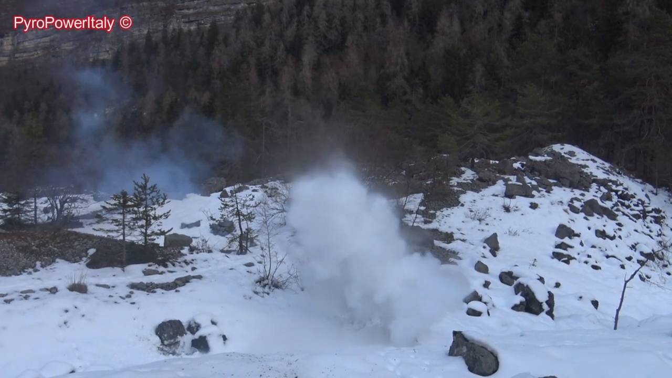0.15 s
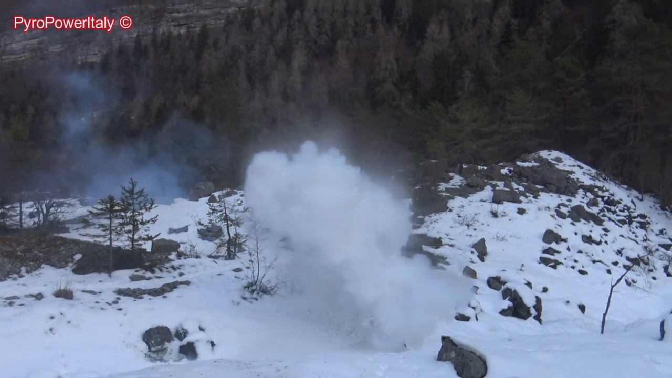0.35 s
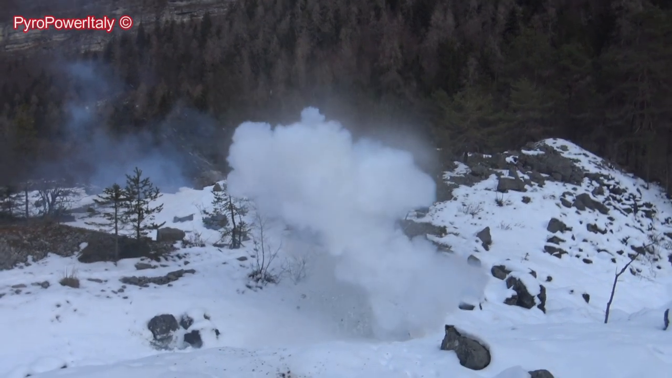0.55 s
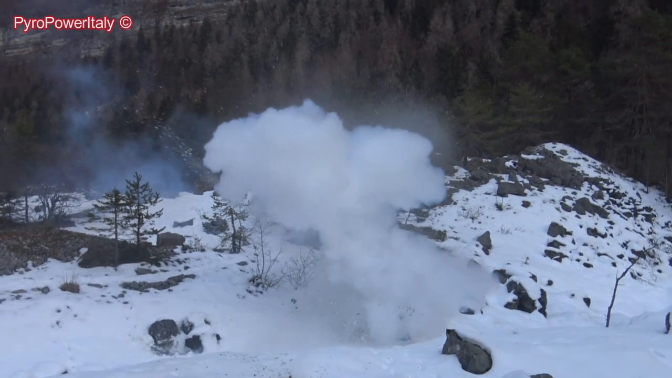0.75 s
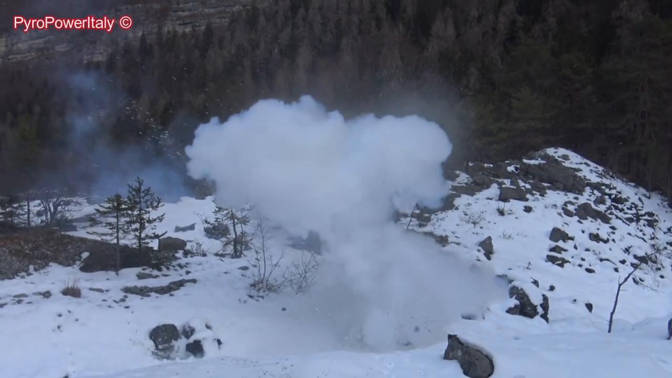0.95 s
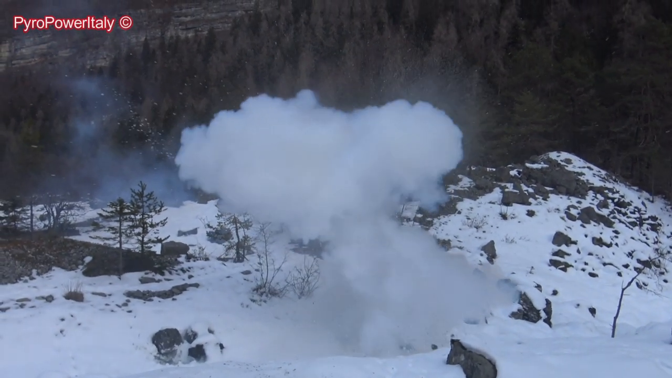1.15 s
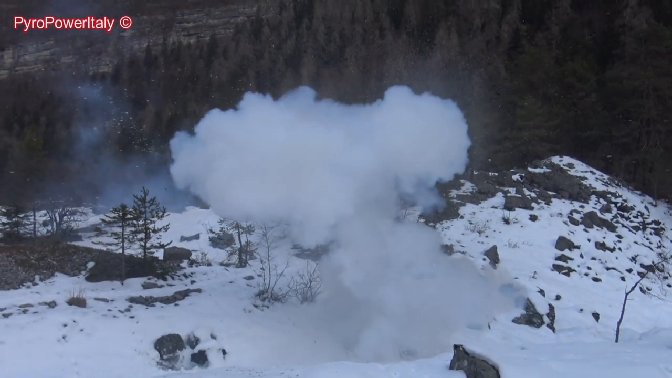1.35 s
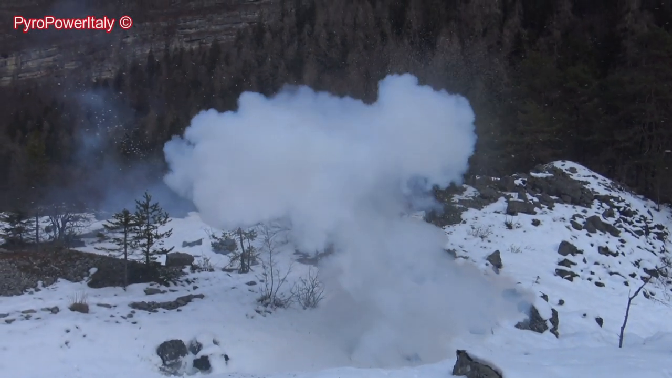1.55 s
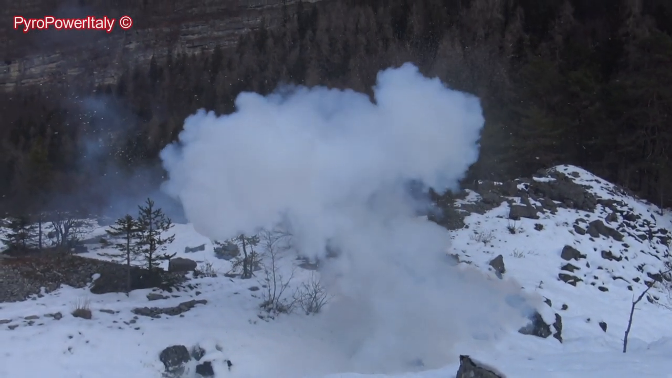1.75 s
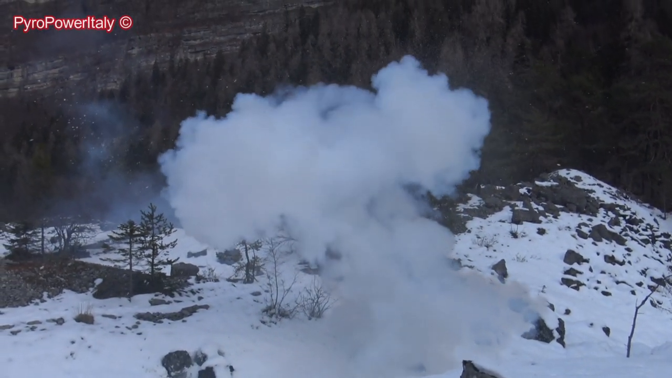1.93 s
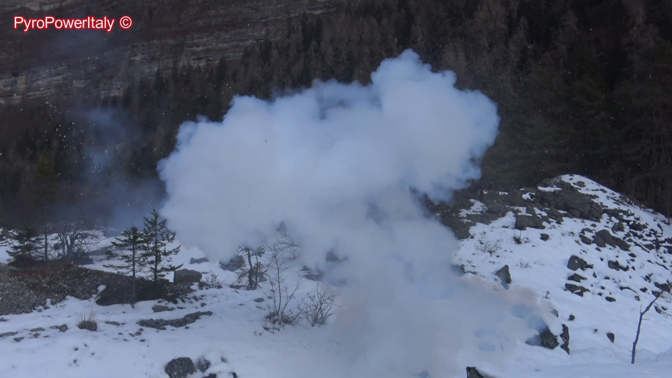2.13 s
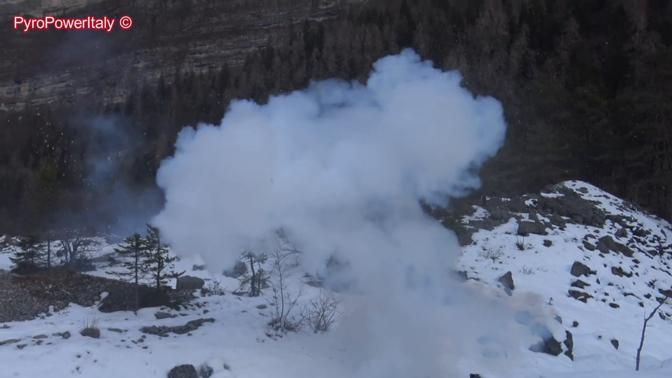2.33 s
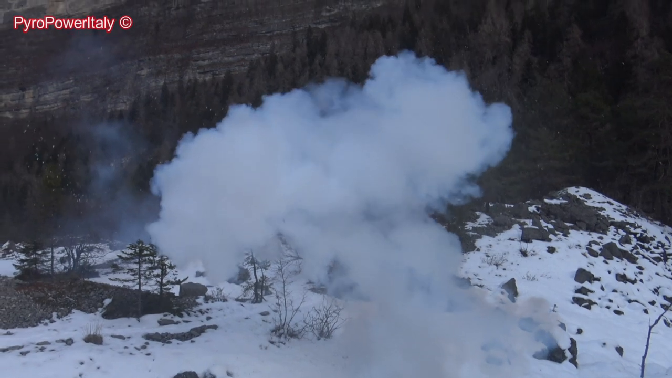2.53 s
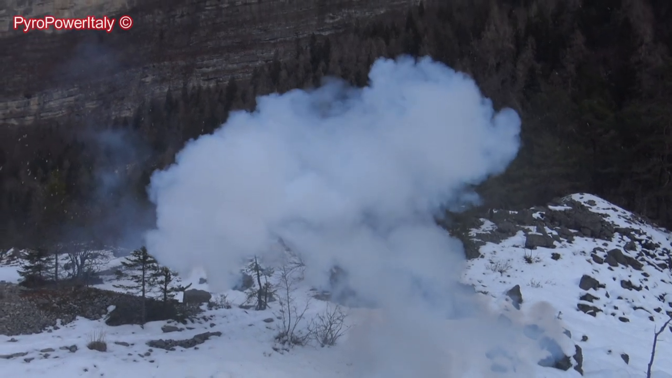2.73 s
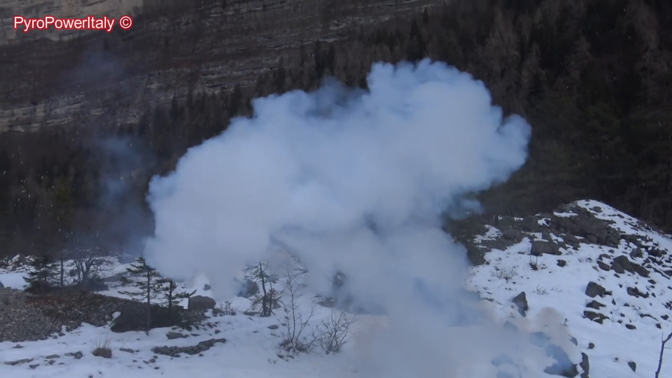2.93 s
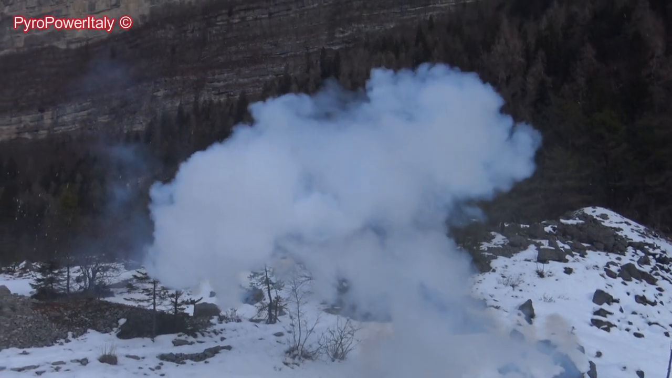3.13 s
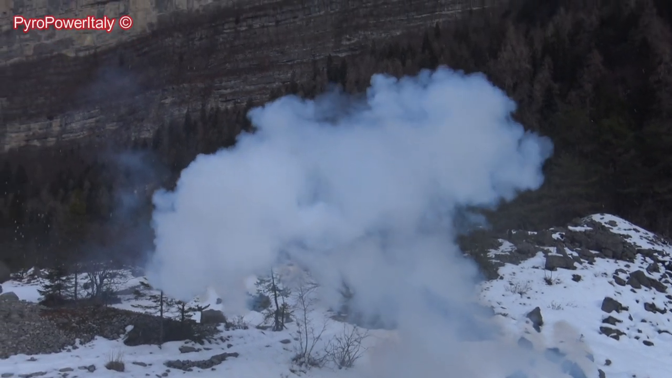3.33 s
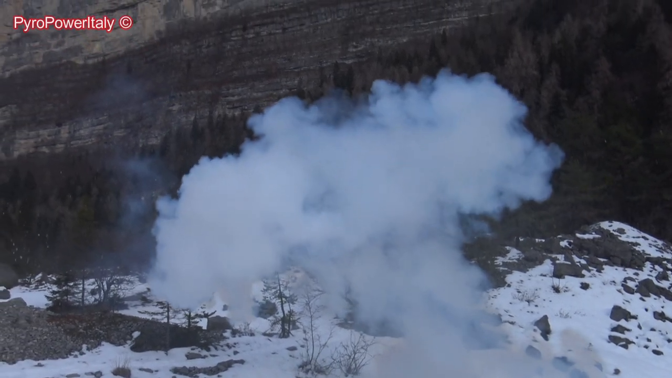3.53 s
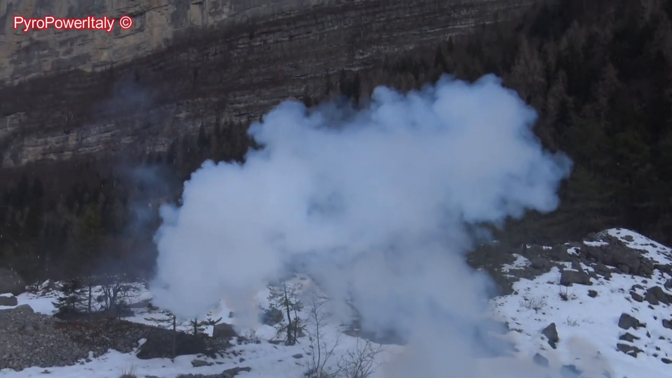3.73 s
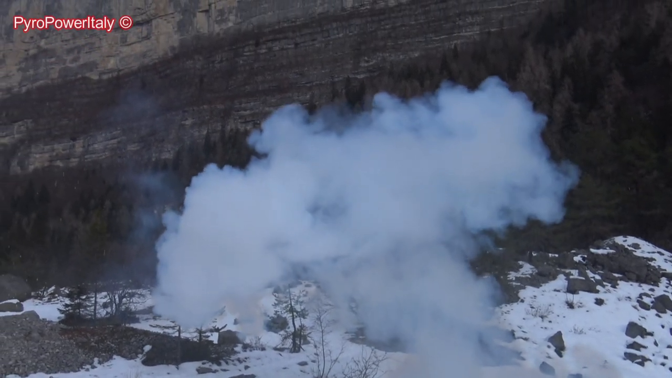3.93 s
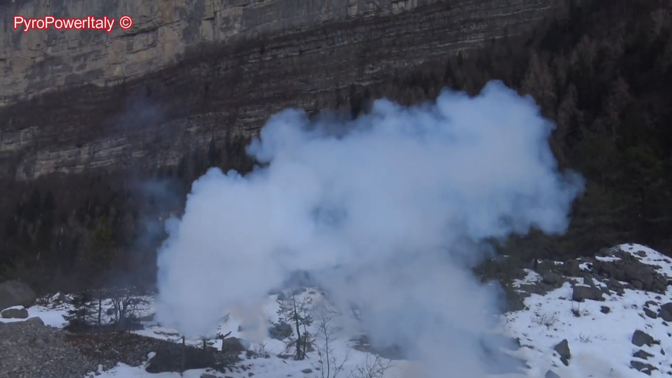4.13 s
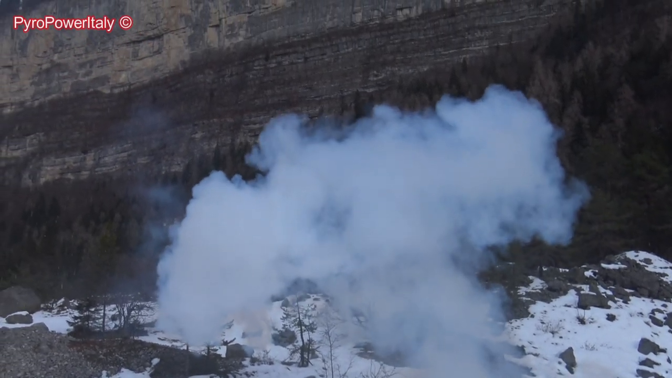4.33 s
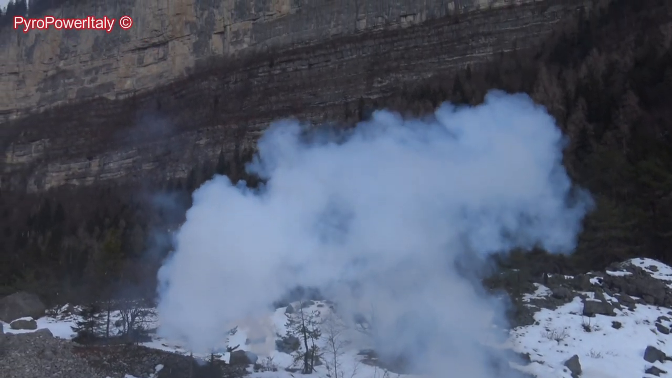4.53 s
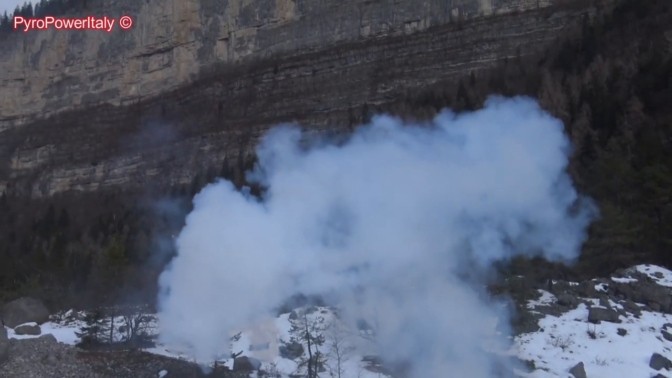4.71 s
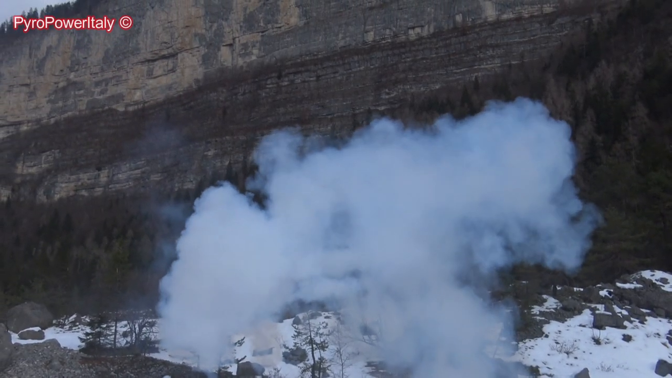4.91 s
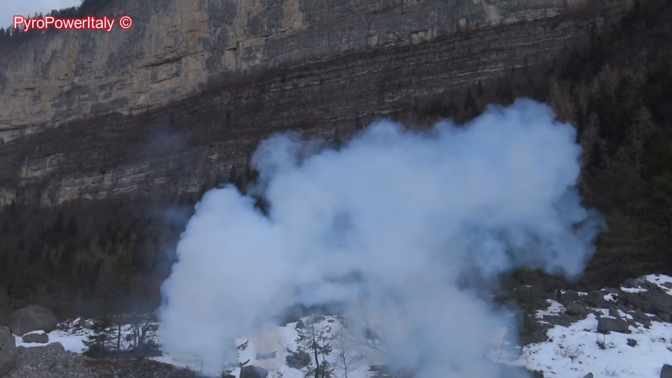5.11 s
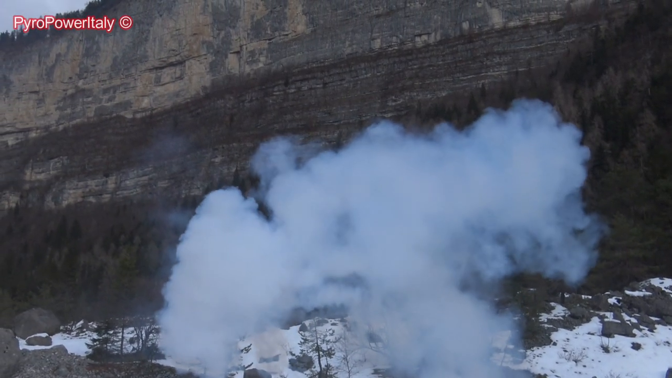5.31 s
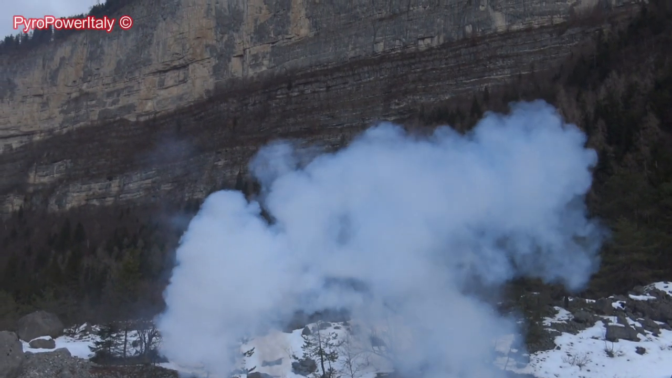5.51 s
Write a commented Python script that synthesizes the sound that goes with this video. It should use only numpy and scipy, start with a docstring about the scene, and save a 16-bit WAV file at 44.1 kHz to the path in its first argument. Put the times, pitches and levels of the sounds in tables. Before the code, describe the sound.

One sharp, distorted blast on a snowy slope, followed by dulling rolling echoes and booms, with grit and small stones falling late.

```python
"""On a snowy mountain slope a large firecracker goes off: one crack that overloads the microphone. The crack is
noise driven into saturation, followed by a slow low swing and a thump off the near slope. A long roll follows
as rocks, forest and cliffs scatter the blast back: shaped noise that grows duller with time, plus short booms
from single faces. Grit (grainy noise) and small stones (short taps of close modes) patter down while the roll
fades, over the hiss of still air."""
import sys
import numpy as np
from scipy import signal
from scipy.fft import rfft, irfft, next_fast_len
from scipy.io import wavfile
from scipy.ndimage import uniform_filter1d, minimum_filter1d, map_coordinates

SR = 44100
rng = np.random.default_rng(int(sys.argv[2]) if len(sys.argv) > 2 else 0)


def transcribe(signal):
    """Save signal, clipped to [-1, 1], as a 16-bit WAV file at the path in sys.argv[1]."""
    frames = np.atleast_2d(signal).T
    limited = np.clip(frames, -1, 1)
    pcm = np.round(limited * 32767).astype(np.int16)
    wavfile.write(sys.argv[1], SR, pcm)


N = 249606  # length in samples

BLAST_S = 0.0974
GRIT_FULL_S = 2.95  # the fall of grit reaches its full level


def amp(db):
    """Decibels to gain."""
    return 10 ** (np.asarray(db) / 20)


def unit(x):
    """Scale to rms 1."""
    return x / np.sqrt(np.mean(x ** 2) + 1e-20)


def along(points, hz):
    """Read a curve of (Hz, value) points on a log frequency axis."""
    f, v = np.transpose(points)
    return np.interp(np.log(hz + 1), np.log(f + 1), v)


def since(start):
    """Seconds since start, 0 before it."""
    return np.maximum(np.arange(N) / SR - start, 0)


def wobble(rate):
    """A smooth random curve, rate knots a second."""
    knots = rng.standard_normal(int(N * rate / SR) + 4)
    return map_coordinates(knots, [np.arange(N) * rate / SR])


def filtered(x, response):
    """Multiply the spectrum of x by a response given as a function of frequency in Hz."""
    m = next_fast_len(N + SR // 2)  # padded so that the end does not wrap onto the start
    hz = np.fft.rfftfreq(m, 1 / SR)
    return irfft(rfft(x, m) * response(hz), m)[..., :N]


def coloured(x, spectrum):
    """Shape x with (Hz, dB) points and scale it to rms 1."""
    return unit(filtered(x, lambda hz: amp(along(spectrum, hz))))


def noise_pair(wider_db=0):
    """White noise at two closely spaced microphone ports, which differ most around 5 kHz."""
    # Each row: frequency in Hz, side level relative to mid in dB before wider_db is added
    port_difference = [(100, -21), (600, -18.5), (1200, -21.5), (2200, -30.5), (3100, -10.5), (5200, -8),
                       (7200, -12.5), (9500, -19.5), (12000, -21)]
    mid, side = rng.standard_normal((2, N))
    side = filtered(side, lambda hz: amp(along(port_difference, hz) + wider_db))
    return unit(np.array([mid + side, mid - side]))


def even(x, span):
    """Take out swells slower than span seconds, the same for both ports."""
    power = uniform_filter1d(np.mean(x ** 2, 0), max(int(span * SR), 8))
    return x / np.sqrt(np.abs(power) + 1e-9)


def panned(x, pan_db):
    """Tilt a stereo pair by pan_db, left minus right."""
    return np.array([x[0] * amp(pan_db / 2), x[1] * amp(-pan_db / 2)])


def still_air(level_db=-43):
    """Still mountain air at the microphone: a steady hiss, mostly low."""
    # Each row: frequency in Hz, relative level in dB
    air_colour = [(35, -13.5), (60, 7), (107, 1), (361, 7.5), (1090, 2.5), (2900, -15), (9400, -30.5),
                  (12000, -37), (15600, -54.5), (22000, -120)]
    return amp(level_db) * coloured(noise_pair(wider_db=5), air_colour)


def crack(t60=0.018, front_db=-3, front_t60=0.014):
    """The shock and its ground reflections saturate the microphone for about ten milliseconds."""
    t = since(BLAST_S)
    overload_end = BLAST_S + .0085
    # Each row: frequency in Hz, relative level in dB
    body_colour = [(80, -7), (400, 10), (900, 7.5), (1400, 3.5), (3500, 4), (5000, -13.0), (12000, -24)]
    front_colour = [(800, -26), (3500, 1), (6000, 11), (12000, -22)]
    body = coloured(noise_pair(), body_colour) * amp(-60 * since(overload_end) / t60)
    front = coloured(noise_pair(), front_colour) * amp(front_db - 60 * t / front_t60)
    return .85 * np.tanh(body + front) * (t > 0)


def push(start, hz, level_db, rise, t60):
    """A few slow cycles, rising and then dying away (times in s)."""
    t = since(start)
    fade = amp(level_db - 60 * since(start + rise) / t60)
    return fade * np.minimum(t / rise, 1) * np.sin(2 * np.pi * hz * t)


def after_swing():
    """A slow low swing follows right after the crack."""
    return push(.1125, hz=110, level_db=-5.5, rise=0.00087, t60=0.049)


def course(top_db, build_s, build_db, hold_s, fade_db_per_s, far_db):
    """Gain that builds up until build_s, holds until hold_s and fades to the level of the far slopes."""
    building_db = build_db * np.maximum(1 - since(0) / build_s, 0)
    fading_db = np.maximum(top_db - fade_db_per_s * since(hold_s), far_db)
    return amp(fading_db - building_db)


def with_answers(bed, rows):
    """Gain of a bed plus bell-shaped answers (s, level dB, half length s), summed in power."""
    t = since(0)
    answers = sum(amp(db) ** 2 * np.exp(-((t - s) / half) ** 2) for s, db, half in rows)
    return np.sqrt(bed ** 2 + answers)


def dips(half_s=0.0089):
    """Gain of the short lulls between the first groups of echoes."""
    # Each row: centre in seconds, depth in dB
    lulls = [(0.338, 6.5), (.422, 3), (.555, 3), (.815, 2), (1.025, 2.5)]
    t = since(0)
    return amp(-sum(depth_db * np.exp(-((t - s) / half_s) ** 2) for s, depth_db in lulls))


def surging(x, split_hz=1500, surge_db=0.5, sparkle_db=1.07):
    """Bare rock returns more treble than snow and trees, so the top of the roll surges on its own."""
    low = filtered(x, lambda hz: 1 / (1 + (hz / split_hz) ** 4))
    treble_gain = amp(surge_db * wobble(22.11) + sparkle_db * wobble(130))
    return low + (x - low) * treble_gain


def air_loss(x, db_per_s, power):
    """A later echo has crossed more air, which takes the treble first; the midrange is held level."""
    hz, t, z = signal.stft(x, SR, nperseg=1024)
    loss_db = db_per_s * (hz[:, None] / 1000) ** power * t  # db_per_s is the loss at 1 kHz
    dulled = z * amp(-loss_db)
    mids = (hz > 300) & (hz < 1500)
    mean_power = np.mean(np.abs(z) ** 2, axis=(0, 2))[:, None]
    # power left in the midrange at each moment, as a share of the whole undulled sound
    share = np.sum((mean_power * amp(-2 * loss_db))[mids], 0) / np.sum(mean_power)
    return signal.istft(dulled / np.sqrt(share), SR, nperseg=1024)[1][:, :N]


def scattered_roll(swell_db=0.4, flutter_db=0.46, grain_db=1.12):
    """Countless rocks and trees return the crack, in bunches that surge at ridges and stands of trees."""
    # Each row: frequency in Hz, relative level in dB before the air dulls it
    scatter_colour = [(60, -24.5), (150, -5), (230, 1.35), (370, 1), (520, -3), (700, -3), (950, -3),
                      (1650, -6), (2200, -7.5), (3000, -8), (3800, -12.5), (5500, -17.3), (8000, -24.5),
                      (10500, -28), (12000, -34.5)]
    # Ridges and stands of trees. Each row: centre in seconds, level in dB, half length in seconds
    ridge_answers = [(0.162, -17.5, 0.05), (0.382, -20, 0.018), (.465, -18.5, .025), (0.592, -17.5, 0.021),
                     (0.687, -16.5, .025), (0.762, -16, 0.02), (0.925, -17.5, 0.05), (1.065, -18, 0.051),
                     (1.223, -20, 0.048), (1.354, -21.5, 0.071), (1.518, -17.5, 0.023),
                     (1.716, -19.5, 0.037), (2.5, -24, 0.57), (3.7, -31, 0.026)]
    bed = course(top_db=-15, build_s=0.86, build_db=2, hold_s=0.9, fade_db_per_s=1.28, far_db=-20)
    roll_gain = with_answers(bed, ridge_answers) * dips()
    # returns bunch together, from slow swells to fine grain
    bunching = amp(swell_db * wobble(16) + flutter_db * wobble(60) + grain_db * wobble(700))
    returns = coloured(surging(noise_pair() * bunching), scatter_colour)
    return roll_gain * air_loss(returns, db_per_s=2.0, power=1.463)


def slope_boom(waver_db=1.5):
    """Broad slopes return the bass of the blast as wavering low noise."""
    # Each row: frequency in Hz, relative level in dB
    boom_colour = [(40, -34), (75, -9), (100, -0.5), (140, -1.7), (200, -4.5), (280, -16.5), (500, -33.5),
                   (1500, -120)]
    slopes = course(top_db=-16, build_s=0.68, build_db=13, hold_s=2, fade_db_per_s=1.4, far_db=-19.5)
    boom_gain = slopes * amp(waver_db * wobble(14))
    return boom_gain * even(coloured(noise_pair(), boom_colour), span=0.08)


def cliffs(pitch_spread=.15, count=3, half_length_cycles=1.64):
    """A broad face returns the blast as a few slow cycles; its ledges each add a slightly different pitch."""
    # Single cliff faces. Each row: centre in seconds, relative level in dB, middle pitch in Hz
    faces = [(.168, -9.5, 290), (.395, -9, 300), (.49, -6.5, 300), (.53, -6, 340), (.542, -9, 180),
             (0.601, -10.5, 249), (.66, -9.5, 150), (.70, -13.5, 332), (.90, -10, 330), (0.934, -9, 135),
             (1.025, -6.5, 290), (1.105, -6, 280), (1.378, -10, 156), (1.429, -9, 125), (1.445, -7, 275),
             (1.51, -7, 170), (1.544, -4.5, 153), (1.572, -10, 135), (1.62, -3, 142), (1.648, -6, 141),
             (1.71, -6, 520), (1.818, -7.5, 164), (1.847, -4.5, 143), (1.915, -7.5, 135), (2.118, -7, 134),
             (2.38, -7, 130), (2.71, -7.5, 132), (2.935, -8.5, 150), (3.11, -9.5, 135), (3.224, -8, 150),
             (3.482, -12, 153), (4.285, -7, 134), (4.689, -8, 124), (5.171, -11.5, 140)]
    t, out = since(0), np.zeros(N)
    for s, db, hz in faces:
        near = np.abs(t - s) < .1
        u = t[near] - s
        ledges_hz = hz * (1 + pitch_spread * rng.standard_normal((count, 1)))
        cycles = np.cos(2 * np.pi * (ledges_hz * u + rng.random())).mean(0)
        out[near] += amp(db) * cycles * np.exp(-(u * hz / half_length_cycles) ** 2)
    return out


def valley_rumble(level_db=-23.5, fade_db_per_s=1):
    """Deep rumble of the valley, swelling as whole mountainsides answer."""
    # Each row: frequency in Hz, relative level in dB
    rumble_colour = [(12, -32), (25, -5.5), (42, 0.5), (62, -4.5), (90, -5.5), (160, -34), (600, -120)]
    # Whole mountainsides. Each row: centre in seconds, level in dB, half length in seconds
    mountainside_swells = [(0.32, -14, 0.088), (0.747, -29, 0.071), (1.1, -28, .04), (1.732, -19, .05),
                           (2.191, -16.5, 0.18), (2.827, -20, .06), (4.45, -24, 0.31), (5.42, -27, 0.094)]
    bed = amp(level_db - fade_db_per_s * since(BLAST_S))
    gain = with_answers(bed, mountainside_swells)
    return gain * even(coloured(noise_pair(), rumble_colour), span=0.47)


def echoes(rise=0.00041, rumble_pan_db=-2.5):
    """All that the land sends back, each part from its side, beginning shortly after the blast."""
    # Side from which the echoes come. Each row: time in seconds, left minus right in dB
    bearing = [(.15, 0), (.7, -1.5), (.98, 3), (1.28, 3), (1.9, -2), (2.85, -2), (3.6, -0.5), (5.66, -1)]
    first_return = BLAST_S + .022
    turn_s, turn_db = np.transpose(bearing)
    pan_db = np.interp(since(0), turn_s, turn_db)
    moving = panned(scattered_roll() + slope_boom() + cliffs(), pan_db)
    rumble = panned(valley_rumble(), rumble_pan_db)  # the valley opens to the right
    return (moving + rumble) * np.minimum(since(first_return) / rise, 1)


def near_slope_thump():
    """The near slope returns a soft, deep push of air."""
    return push(.225, hz=55.2, level_db=-10.0, rise=.085, t60=0.36)


def ticks(level_db=12, corner_hz=4200):
    """Single sharp ticks crackle dry in the roll at set times: softened one-sample spikes."""
    # Each row: time in seconds, level in dB before level_db is added
    sharp_ticks = [(0.3345, -27), (0.3819, -27), (0.4198, -29), (0.4569, -27), (0.6104, -29),
                   (0.9132, -37), (1.1108, -44), (1.2455, -44), (1.5428, -42)]
    s, db = np.transpose(sharp_ticks)
    spikes = np.bincount(np.round(s * SR).astype(int), amp(db + level_db), N)
    return filtered(spikes, lambda hz: 2 / (1 + 1j * hz / corner_hz))


def grit(grain_db=2.0, clump_db=1.5, start_s=1.2, early_db=-57.5, full_db=-48):
    """Fine thrown dirt rains on snow and branches: clumpy noise, a faint bed that rises from start_s."""
    # Each row: frequency in Hz, relative level in dB
    grit_colour = [(500, -10.5), (2000, 0), (3600, -1.5), (4800, -6.5), (5800, -6.5), (6800, -14),
                   (8000, -16), (9000, -21), (11000, -24.5), (13000, -33)]
    grains = noise_pair(wider_db=-5.0) * amp(grain_db * wobble(900) + clump_db * wobble(40))
    fall_db = np.interp(since(0), [start_s, GRIT_FULL_S], [early_db, full_db])
    return amp(fall_db) * coloured(grains, grit_colour)


def pebbles(count=45, typical_db=-45.5, spread_db=1, typical_hz=5000):
    """Random landings in the full fall of grit, as rows like those of the stones; the higher, the fainter."""
    when = rng.uniform(GRIT_FULL_S, N / SR, count)
    size, pitch = rng.standard_normal((count, 2)).T
    level_db = typical_db + spread_db * (size - pitch)
    return list(zip(when, level_db, typical_hz * 2 ** (pitch / 2)))


def stones(level_db=-1.5, attack=0.0007, t60=0.019, spray_db=-3, count=6):
    """Each stone lands with a short tap of a few close modes and a spray of crumbs."""
    # Each row: landing in seconds, level in dB before level_db is added, pitch in Hz
    landings = [(2.522, -38.5, 4800), (2.637, -42, 6500), (2.978, -28.5, 3920), (3.199, -30, 3930),
                (3.333, -36, 4300), (3.553, -39, 3800), (3.627, -32, 3500), (3.662, -37, 3200),
                (3.762, -43, 6300), (3.787, -39, 4200), (4.124, -42, 4400), (4.143, -40, 4300),
                (4.175, -39, 3700), (4.183, -36, 3660), (4.257, -22, 2390), (4.259, -36, 4040),
                (4.268, -37, 3400), (4.284, -38, 7400), (4.285, -36, 3200), (4.357, -46, 6800),
                (4.385, -35, 3600), (4.417, -36, 3500), (4.520, -33, 4180), (4.528, -41, 5740),
                (4.590, -44, 6500), (4.607, -33, 3680), (4.837, -36, 3400), (4.998, -37, 3400),
                (5.035, -37, 7370), (5.043, -32, 3900), (5.100, -35, 2900), (5.101, -32, 5000),
                (5.186, -37, 3300), (5.282, -38, 5600), (5.299, -31, 2500), (5.429, -35, 4200),
                (5.445, -26, 2820), (5.447, -32.5, 4300), (5.455, -31, 2900), (5.548, -36, 4500)]
    out, t = np.zeros((2, N + SR)), np.arange(SR // 6) / SR
    hz = np.fft.rfftfreq(len(t), 1 / SR) + 1
    for s, db, pitch_hz in landings + pebbles():
        # smaller, higher stones spread their modes wider and spray brighter
        spread = pitch_hz / 38000
        modes = pitch_hz * (1 + spread * (np.linspace(-1, 1, count) + rng.normal(0, .15, count)))
        phases = rng.random((count, 1))
        ring = unit(np.sin(2 * np.pi * (modes[:, None] * t + phases)).sum(0))
        band = 1 / (1 + 1j * (hz / pitch_hz - pitch_hz / hz)) ** 3  # band-pass around the pitch
        spray = unit(irfft(rfft(rng.standard_normal(len(t))) * band, len(t)))
        envelope = amp(db + level_db - 60 * t / t60) * (1 - np.exp(-t / attack))
        tap = (ring + amp(spray_db) * spray) * envelope
        sides = amp(rng.normal(0, 1) * np.array([[1], [-1]]))  # each lands a little left or right
        out[:, round(s * SR):][:, :len(t)] += tap * sides
    return out[:, :N]


def far_wall(level_db=-16.0, arrival=4.45, half_s=0.31):
    """A distant rock wall answers late with one soft swell of bass."""
    # Each row: frequency in Hz, relative level in dB
    wall_colour = [(40, -29), (68, 1), (105, 2.5), (150, -5), (220, -31), (400, -120)]
    swell = np.exp(-((since(0) - arrival) / half_s) ** 2)
    return amp(level_db) * swell * even(coloured(noise_pair(), wall_colour), span=0.087)


def scene():
    """Still air, the crack and the swing after it, the land's answers and falling debris."""
    blast = crack() + after_swing()
    answers = echoes() + near_slope_thump() + ticks() + far_wall()
    debris = grit() + stones()
    return still_air() + blast + answers + debris


def record(dry, top_hz=12400):
    """A fast limiter holds the peaks at full scale, then a steep low-pass ends the band at top_hz."""
    needed = 1 / np.maximum(np.abs(dry).max(0), 1)
    held = minimum_filter1d(needed, size=129)  # samples
    gain = uniform_filter1d(uniform_filter1d(held, size=65), size=65)
    return filtered(dry * gain, lambda hz: 1 / (1 + (hz / top_hz) ** 80))


dry = scene()
out = record(dry)
transcribe(out)
```